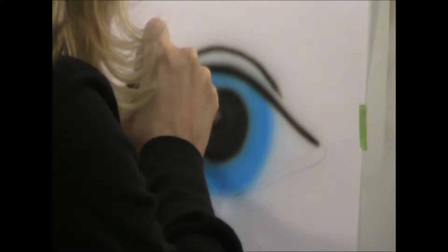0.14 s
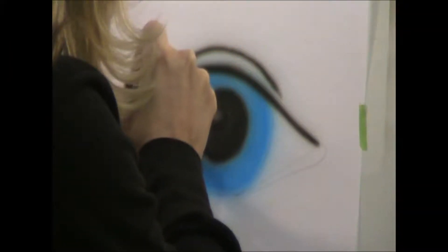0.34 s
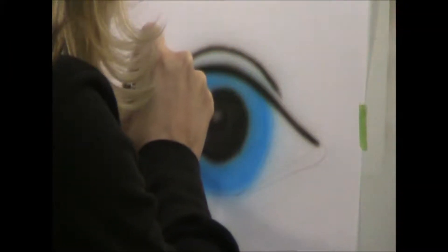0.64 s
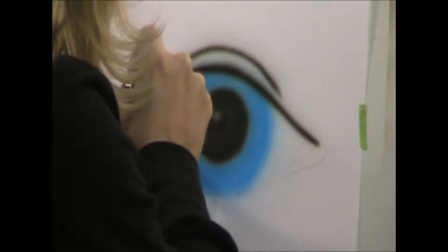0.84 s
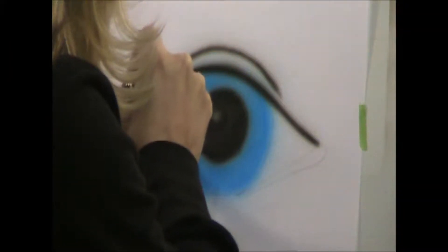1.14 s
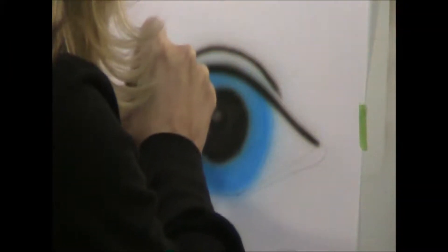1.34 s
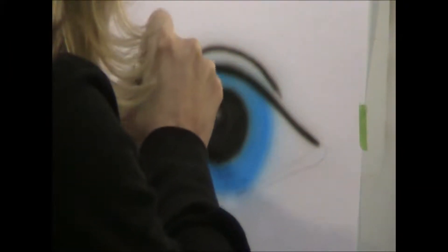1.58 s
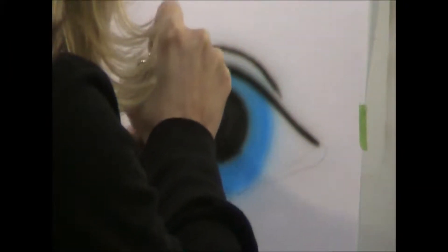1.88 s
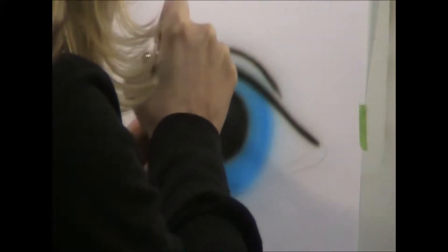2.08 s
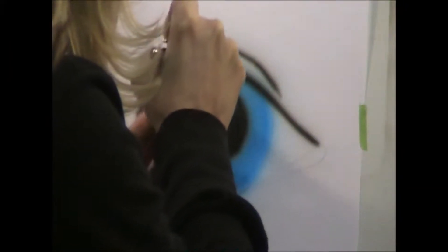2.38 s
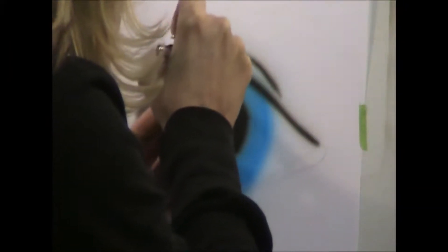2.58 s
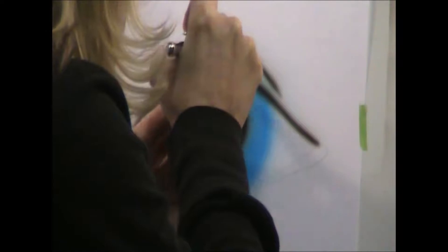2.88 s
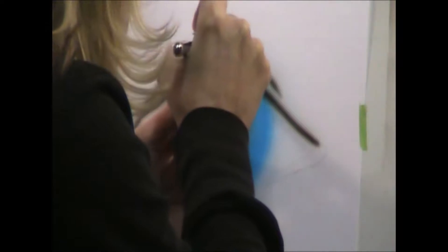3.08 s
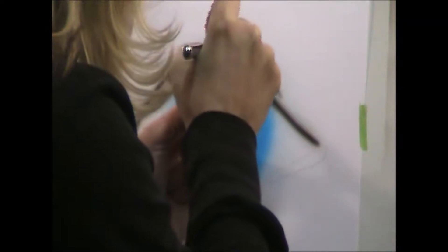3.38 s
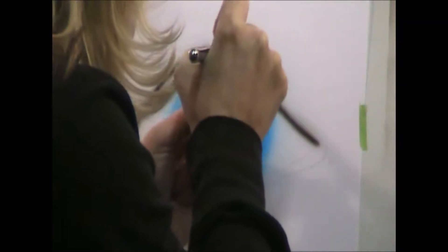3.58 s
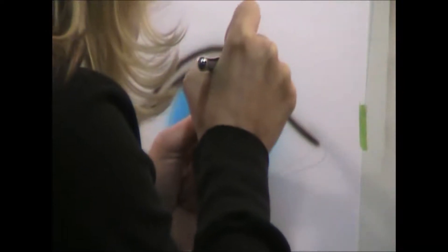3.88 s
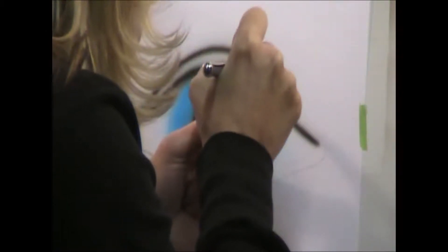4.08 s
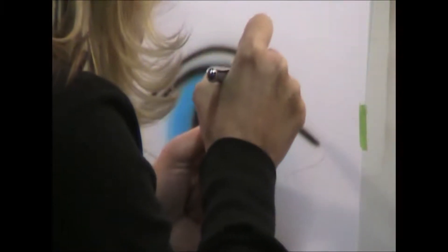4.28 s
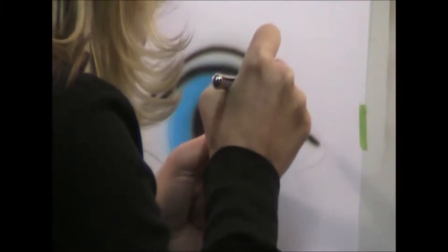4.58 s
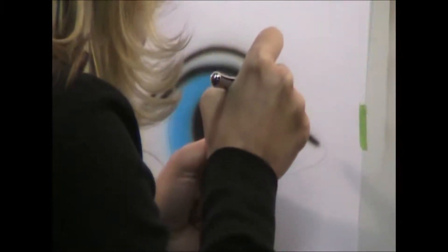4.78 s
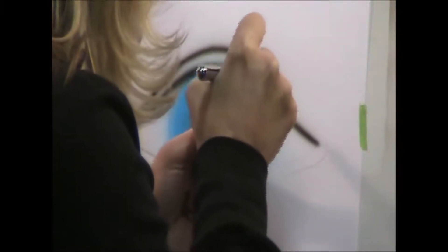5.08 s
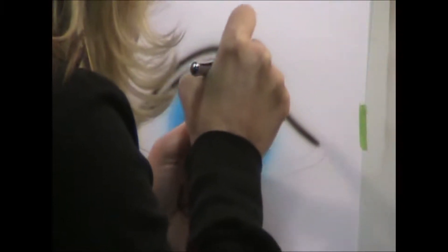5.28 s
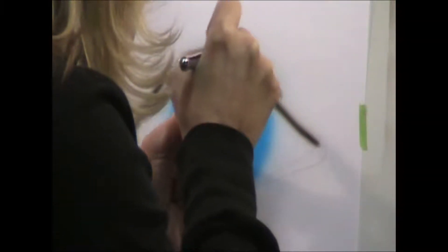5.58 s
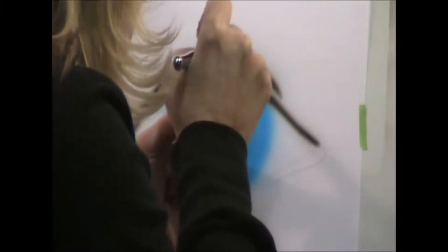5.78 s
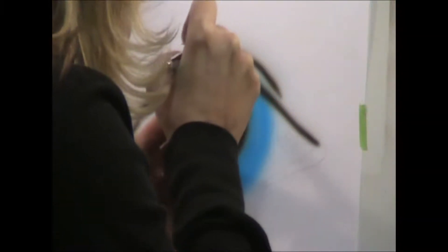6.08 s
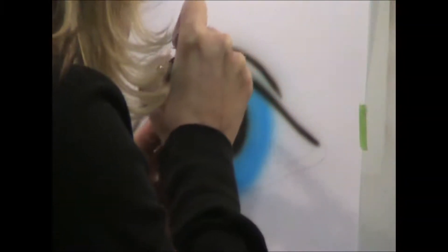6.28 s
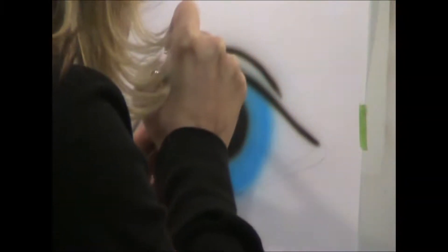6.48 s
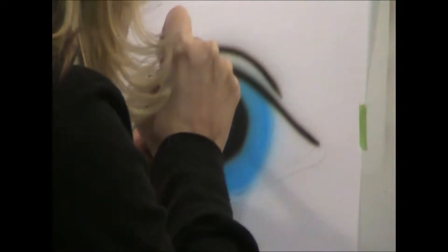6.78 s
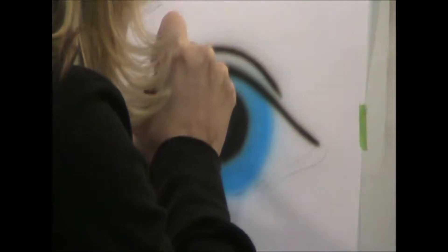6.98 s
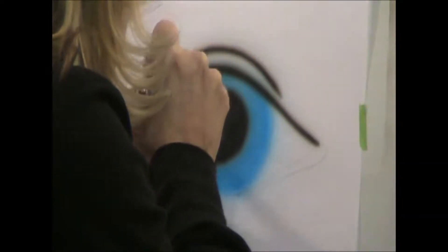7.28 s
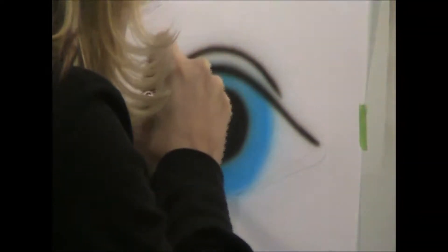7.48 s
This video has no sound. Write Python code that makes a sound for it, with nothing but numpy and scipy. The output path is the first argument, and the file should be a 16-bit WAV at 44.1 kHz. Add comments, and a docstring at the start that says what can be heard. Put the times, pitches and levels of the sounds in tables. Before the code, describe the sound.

A small airbrush hisses steadily and closely, its tone shifting as the hand moves, with one wooden knock midway over faint motor hum.

```python
"""A small studio, one microphone on the left channel; the right has only faint electronic hiss.
From the start an airbrush sprays steadily at a board: splash, jet and mist are coloured turbulence.
As the hand travels out, reflections between hand and board comb the hiss and its resonances sink in pitch.
Around 4 s something wooden knocks a little way off: short force pulses give a room-filling thud and ringing.
After 5 s the hand cups the nozzle and returns, muffling the hiss; motor hum and room rumble run throughout."""
import sys
import numpy as np
from scipy import signal
from scipy.fft import rfft, irfft
from scipy.io import wavfile

SR = 44100
rng = np.random.default_rng(int(sys.argv[2]) if len(sys.argv) > 2 else 0)


def to_wav(sig):
    """Store sig (one row per channel, or 1-D mono) as 16-bit WAV at the path in sys.argv[1].

    Samples outside -1..1 are clipped; the rate is SR.
    """
    pcm = np.clip(np.atleast_2d(sig), -1, 1) * 32767
    pcm = np.round(pcm).astype(np.int16)
    wavfile.write(sys.argv[1], SR, pcm.T)  # frames by channels


N = 337362

# All source levels are ahead of the left channel's gain; spectra are relative, as they are scaled to a level.
# the spray, before the trims in airbrush(): time_s, splash_on_board_db, jet_db, fine_mist_db
SPRAY_LEVELS = [(0.0, -48, -38.5, -38.2), (0.4, -47.5, -38, -38), (1.1, -47, -38.1, -36.5),
                (1.6, -49.5, -38.5, -36), (2.1, -47.5, -39, -38), (3.3, -45.5, -39.4, -39),
                (4.8, -44.5, -39.5, -38), (5.3, -41.5, -41.0, -39.5), (6.0, -41.5, -44.5, -42),
                (6.7, -42, -44.5, -42.5), (7.3, -41.5, -43.0, -41), (7.55, -41, -41.5, -37.5)]
# spectra of the air splashing on the board, the jet and the fine mist: pitch_hz, level_db (per Hz)
SPLASH_SPECTRUM = [(300, -34), (600, -17), (1050, -11), (1400, -4.3), (1700, -2.6), (1950, .3), (2130, -1),
                   (2400, -12.5), (3200, -34)]
JET_SPECTRUM = [(1900.0, -18.5), (2300.0, -6.9), (2530.0, -0.4), (3100.0, -1.7), (3700.0, -5.1),
                (4050.0, -1.4), (4450.0, -6.8), (4800.0, -5.4), (6000.0, -6.2), (7700.0, -9.9),
                (9000.0, -21.4)]
MIST_SPECTRUM = [(6800, -21.4), (8200, -4.3), (10000, -3.7), (11500, -.5), (12300, -2.6), (13500, -1.2),
                 (15200, -1), (16000, -4.5)]
# how the hand holds the brush: time_s, reach (0 at rest to about 1 along the stroke), cupping (0-1),
# splash_tilt_db_per_octave, jet_tilt_db_per_octave
HAND_POSE = [(0.0, 0.12, 0.03, 2.5, 4.3), (1.2, 0.02, 0.0, 3.5, 5.5), (1.8, 0.28, 0.06, 0.7, 4.5),
             (2.6, 0.46, 0.16, 4.5, 2), (3.4, 0.82, 0.17, 2.5, -1.2), (4.8, 1.1, 0.1, 1.5, -4.5),
             (5.4, 1.02, 0.9, 4.5, -1.3), (6.0, 0.42, 0.65, -0.2, 0.5), (7.1, 0.09, 0.74, 0.5, 0.8),
             (7.65, 0.3, 0.45, -0.8, -0.5)]
# reflections between hand and board, before cupping and long waves weaken them:
# rest_delay_ms, full_reach_delay_ms, rest_ripple_db, full_reach_ripple_db (negative = inverted)
POCKET_REFLECTIONS = [(0.155, 0.224, -2, -1.15), (0.239, 0.37, -1, 0.74), (0.268, 0.21, -1.26, -0.3),
                      (0.407, 0.534, -1.16, 0.4), (0.512, 0.404, -1, 0.76)]
# standing waves in the air under the hand, weakened likewise:
# rest_centre_hz, width_hz, rest_level_db, full_reach_level_db
STANDING_WAVES = [(4520, 580, 1.1, 6), (5540, 110, 2.8, 4), (5635, 120, -7.5, -2), (6120, 89, -8.5, -3),
                  (7920, 470, -1.5, 7.5), (12460, 510, 3.5, -3)]
# colour of the hiss with the nozzle fully cupped: pitch_hz, level_db
CUPPED_COLOUR = [(1400.0, 3), (2000.0, -0.5), (2600.0, -1.0), (4000.0, -5.5), (5800.0, -5), (7200.0, 0),
                 (8500.0, -1.3), (10500.0, 2.3), (15000.0, 5)]
# contacts of the wooden thing, as clicks before filtering: start_s, level_db, brightness_hz
KNOCK_CONTACTS = [(4.056, -43, 900), (4.079, -45, 800), (4.097, -46, 900), (4.266, -31, 5030),
                  (4.274, -32, 4220), (4.281, -30, 2820), (4.289, -28, 990), (4.298, -36, 800),
                  (4.314, -31.5, 400), (4.327, -34.5, 600), (4.361, -32, 260)]
# modes the wood rings with, before random scatter in level: pitch_hz, level_db, t60_s
WOOD_MODES = [(210, -15, .5), (311, -25, 0.39), (373, -11, 0.13), (585, -27, 0.13), (686, -10, 0.15),
              (820, -30, .18), (1060, -11, 0.17), (1240, -17, .16), (1627, -7, 0.073), (1920, -20, .08),
              (3270, -6.5, .035), (4550, -7, 0.03)]
# motor hum lines, before they waver: pitch_hz, level_db (rms)
HUM_LINES = [(76.3, -66.5), (120, -58.5), (227, -65), (301, -71), (580, -73.5)]
# room rumble: pitch_hz, level_db (per Hz)
RUMBLE_SPECTRUM = [(10, -10), (28, 3), (52, -2.5), (68, 0.5), (105, -5.5), (130, -1), (165, -2), (190, -10),
                   (235, -5.5), (280, -13), (350, -15.5), (550, -12.5), (900, -13), (3000, -66)]
# electronic hiss of the idle right channel: pitch_hz, level_db (per Hz)
IDLE_SPECTRUM = [(20, 7), (60, 4), (100, 2.5), (300, -0.5), (1000, -3.5), (14300, -3), (15500, -8.5)]

RUMBLE_DB, IDLE_DB, LEFT_DB = -52.5, -65, 6   # rms, rms, gain
ROOM_T60_S = 0.35
CUTOFF_HZ = 15700
SINK = 0.16   # share by which standing waves fall in pitch at full reach
SHORT_WAVE_HZ = 3500   # below this, waves bend round the hand and the ripple fades
FRAME = 1024   # samples, half overlapping
BIN_HZ = np.maximum(np.arange(FRAME // 2 + 1) * SR / FRAME, 1)[:, None]
FRAME_S = np.arange(N // (FRAME // 2) + 2) * (FRAME // 2) / SR


def airbrush(splash_trim_db=0.0, jet_trim_db=0.3, mist_trim_db=0.17):
    """Splash, jet and mist are smooth turbulence, all coloured by the changing pocket under the hand."""
    splash_db, jet_db, mist_db = in_time(SPRAY_LEVELS)
    reach, cupping, splash_tilt, jet_tilt = in_time(HAND_POSE)
    # only short waves are thrown back by things as small as an arm
    short_wave_share = np.minimum(BIN_HZ / SHORT_WAVE_HZ, 1)
    ripple_db = ((1 - cupping) * pocket(reach) + near_echoes()) * short_wave_share
    hand_db = ripple_db + cupping * at_hz(CUPPED_COLOUR, BIN_HZ)
    parts = [(SPLASH_SPECTRUM, splash_tilt, splash_db + splash_trim_db),
             (JET_SPECTRUM, jet_tilt, jet_db + jet_trim_db),
             (MIST_SPECTRUM, 0, mist_db + mist_trim_db)]
    power = 0
    for spectrum, tilt, level_db in parts:
        inside = (BIN_HZ > spectrum[0][0]) & (BIN_HZ < spectrum[-1][0])
        colour_db = at_hz(spectrum, BIN_HZ) + tilt * np.log2(BIN_HZ) + hand_db
        colour = inside * from_db(colour_db) ** 2
        # the hand changes the colour; the level follows the table
        power = power + from_db(level_db) ** 2 * colour / colour.mean(axis=0)
    return turbulence(power)


def pocket(reach):
    """Reflections comb the hiss and standing waves add peaks and notches; all follow the reach. In dB."""
    out = 0
    for rest_ms, far_ms, rest_db, far_db in POCKET_REFLECTIONS:
        delay_s = (rest_ms + reach * (far_ms - rest_ms)) / 1000
        depth_db = rest_db + reach * (far_db - rest_db)
        out = out + depth_db * np.cos(2 * np.pi * BIN_HZ * delay_s)
    for rest_hz, width_hz, rest_db, far_db in STANDING_WAVES:
        centre_hz = rest_hz * (1 - SINK * reach)
        height_db = rest_db + reach * (far_db - rest_db)
        out = out + height_db * np.exp(-0.5 * ((BIN_HZ - centre_hz) / width_hz) ** 2)
    return out


def near_echoes(count=12, ripple_db=0.48, creep_s=3e-5):
    """Weak echoes off arm, sleeve and board comb the hiss, their delays creeping at random. In dB."""
    delays_s = rng.uniform(0.0012, 0.007, count)
    creep = signal.resample(rng.standard_normal(size=(count, 8)), len(FRAME_S), axis=1)
    out = 0
    for delay_s, move in zip(delays_s, creep):
        out = out + ripple_db * np.cos(2 * np.pi * BIN_HZ * (delay_s + creep_s * move))
    return out


def turbulence(power):
    """Noise whose power per frequency changes from frame to frame."""
    white = signal.stft(rng.standard_normal(N), nperseg=FRAME)[2]
    coloured = white * np.sqrt(power[:, :white.shape[1]])
    return signal.istft(coloured, nperseg=FRAME)[1][:N]


def knock(thud_db=17.0, scatter_db=1.5, span=5.7, high_hz=6000):
    """Every contact is a short band-limited force pulse: a broad thud that fills the room, and ringing wood."""
    force = np.zeros(N)
    for start_s, level_db, bright_hz in KNOCK_CONTACTS:
        click = np.zeros(N)
        click[round(start_s * SR)] = from_db(level_db)
        top_hz = min(bright_hz, SR / 4)
        band = signal.butter(1, [top_hz / span, top_hz], "band", fs=SR, output="sos")
        force += signal.sosfilt(band, click + 1e-18)   # the tiny offset avoids denormal numbers
    rings = np.zeros(N)
    for hz, level_db, t60_s in WOOD_MODES:
        scattered_db = level_db + scatter_db * rng.standard_normal()
        rings += from_db(scattered_db) * ring(force, hz, t60_s)
    thud = signal.sosfilt(signal.butter(2, high_hz, fs=SR, output="sos"), force)
    return rings + from_db(thud_db) * studio(thud)


def ring(clicks, hz, t60_s):
    """A two-pole resonator: a unit click sets a decaying sine of height about 1 ringing."""
    radius = from_db(-60 / (t60_s * SR))
    angle = 2 * np.pi * hz / SR
    feedback = [1, -2 * radius * np.cos(angle), radius * radius]
    return signal.lfilter([0, np.sin(angle)], feedback, clicks + 1e-18)


def studio(x, tail_db=10.0, early_db=13.0, early_t60_s=0.024):
    """The direct sound, a quick cluster of near reflections and a dense, short tail, both decaying noise."""
    t = np.arange(SR // 2) / SR
    out = x
    for level_db, t60_s in [(early_db, early_t60_s), (tail_db, ROOM_T60_S)]:
        echoes = rng.standard_normal(len(t)) * np.exp(-np.log(1000) * t / t60_s)
        echoes = echoes / np.linalg.norm(echoes)
        out = out + from_db(level_db) * signal.fftconvolve(x, echoes)[:N]
    return out


def motor(waver=0.14, phase_wander_rad=0.5):
    """Hum lines are sines that waver slowly in level and phase."""
    t = np.arange(N) / SR
    out = np.zeros(N)
    for hz, level_db in HUM_LINES:
        swell, slip = signal.resample(rng.standard_normal(size=(2, 32)), N, axis=1)
        height = np.sqrt(2) * from_db(level_db) * (1 + waver * swell)
        out += height * np.sin(2 * np.pi * hz * t + phase_wander_rad * slip)
    return out


def room_rumble():
    """The low background of the room is steady coloured noise."""
    return from_db(RUMBLE_DB) * steady_noise(RUMBLE_SPECTRUM)


def idle_hiss():
    """The electronics of the idle channel give steady coloured noise."""
    return from_db(IDLE_DB) * steady_noise(IDLE_SPECTRUM)


def steady_noise(spectrum):
    """Noise of a fixed colour, rms 1."""
    hz = np.maximum(np.arange(N // 2 + 1) * SR / N, 1)
    white = rfft(rng.standard_normal(N))
    return rms_one(irfft(white * from_db(at_hz(spectrum, hz)), N))


def in_time(rows):
    """Each column of a curve, read once a frame."""
    time_s, *columns = np.transpose(rows)
    return [np.interp(FRAME_S, time_s, column) for column in columns]


def at_hz(points, hz):
    """A spectrum in dB, interpolated on a log-frequency axis."""
    point_hz, level_db = np.transpose(points)
    return np.interp(np.log(hz), np.log(point_hz), level_db)


def from_db(db):
    """Decibels to an amplitude factor."""
    return 10 ** (np.asarray(db) / 20)


def rms_one(x):
    """Scale a signal to rms 1."""
    return x / np.sqrt(np.mean(x ** 2) + 1e-20)


def scene():
    """One microphone feeds the left channel; the right carries only faint electronic hiss."""
    microphone = airbrush() + knock() + motor() + room_rumble()
    return np.array([from_db(LEFT_DB) * microphone, idle_hiss()])


def record(dry):
    """A steep elliptic low-pass cuts the top of both channels."""
    return signal.sosfilt(signal.ellip(12, 0.1, 80, CUTOFF_HZ, fs=SR, output="sos"), dry)


dry = scene()
out = record(dry)
to_wav(out)
```